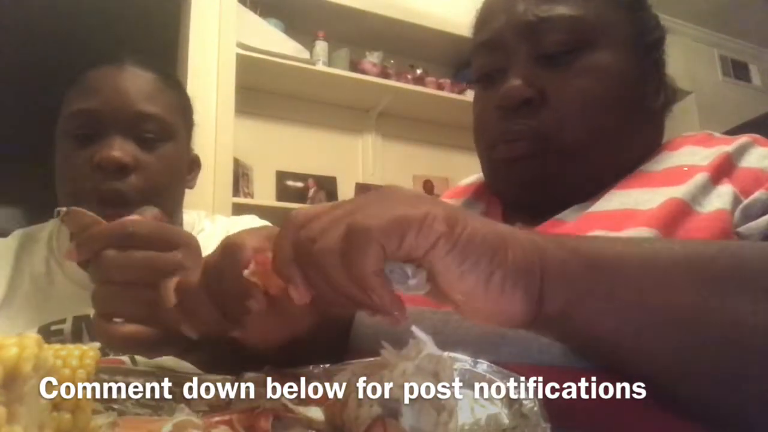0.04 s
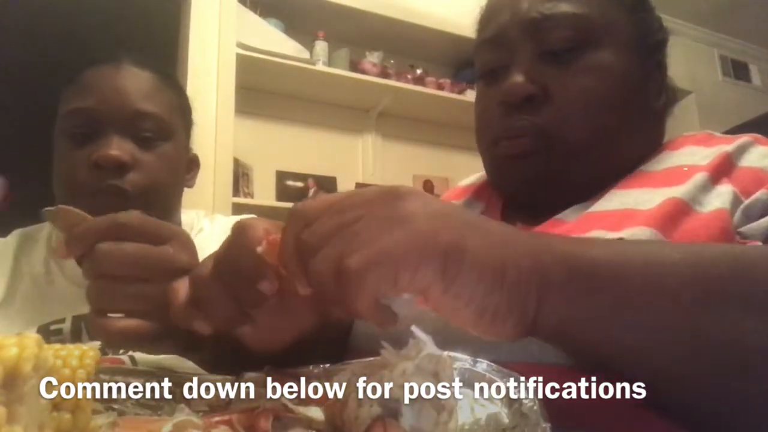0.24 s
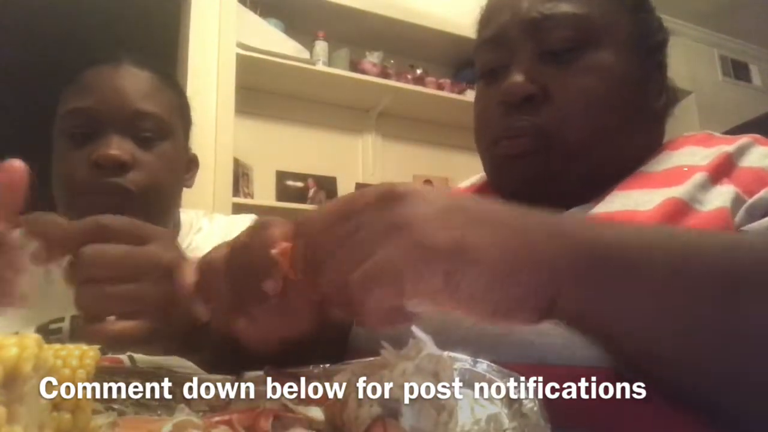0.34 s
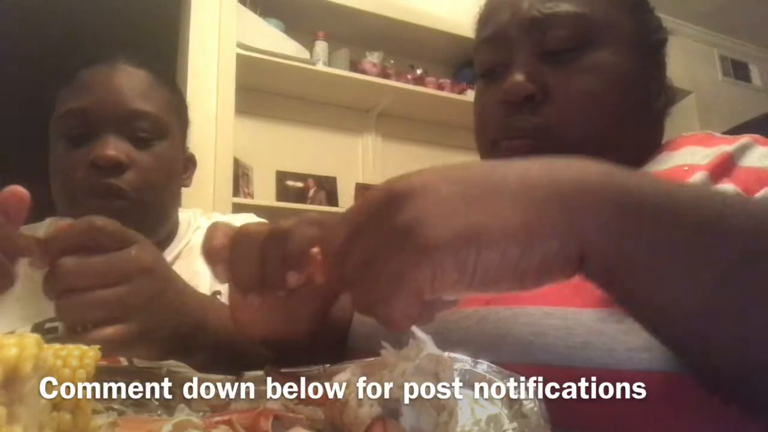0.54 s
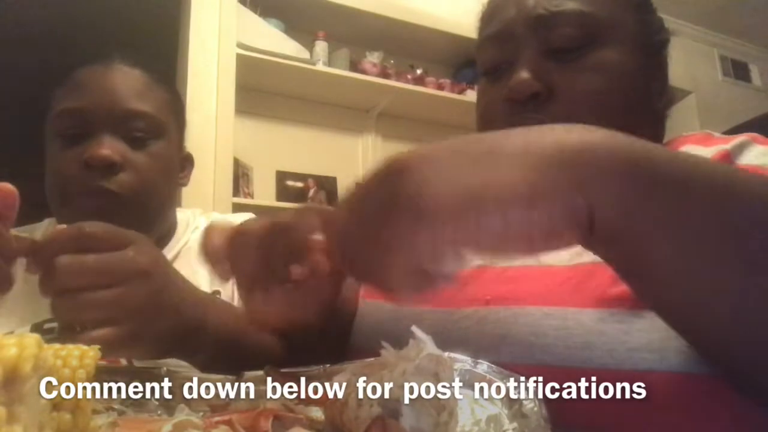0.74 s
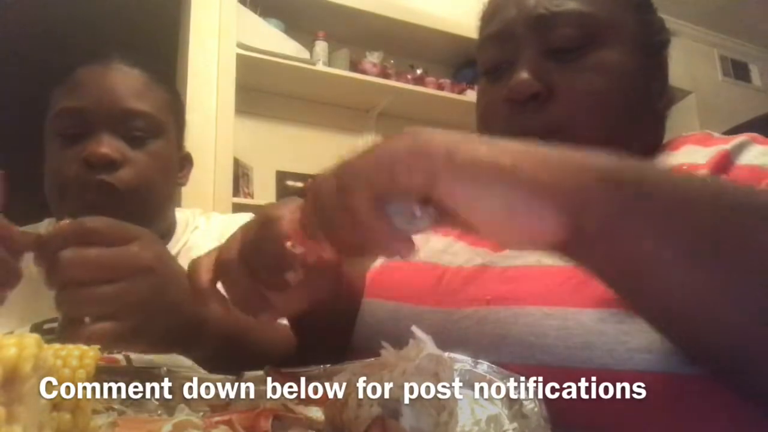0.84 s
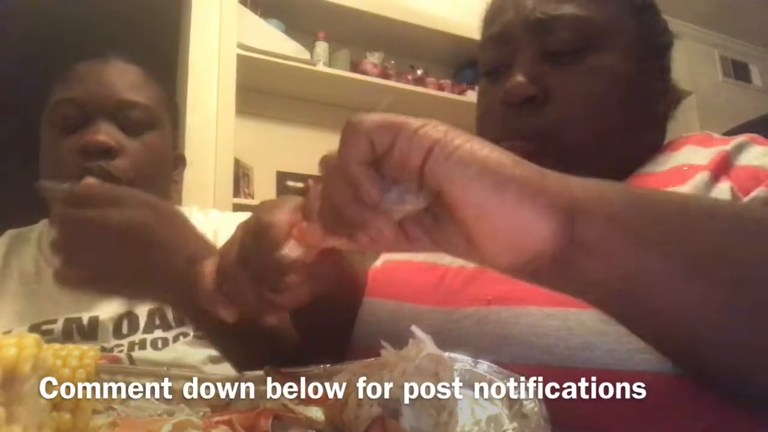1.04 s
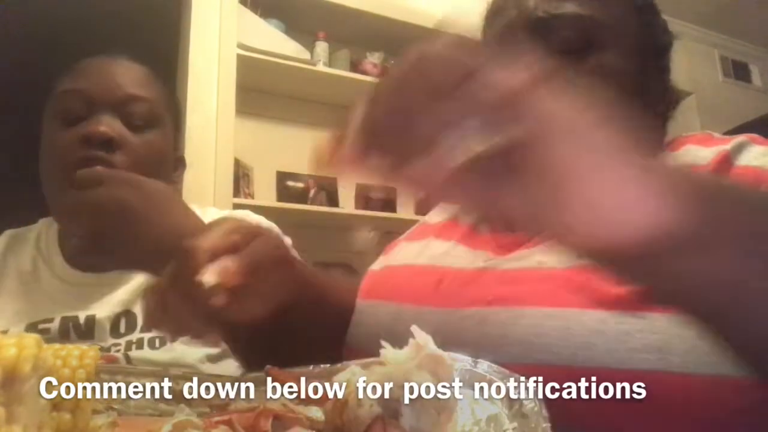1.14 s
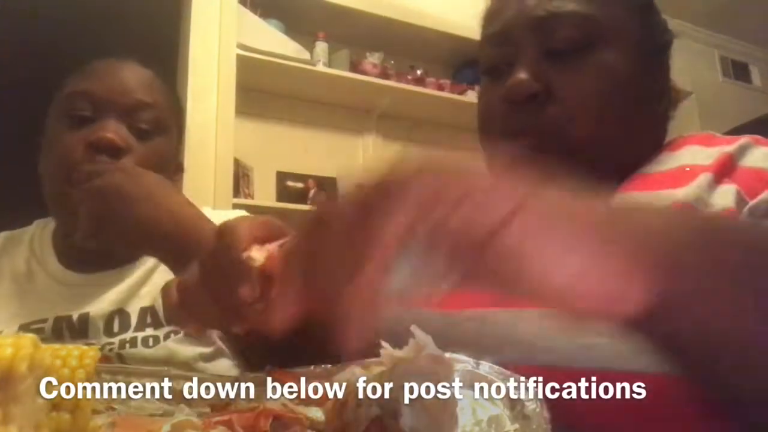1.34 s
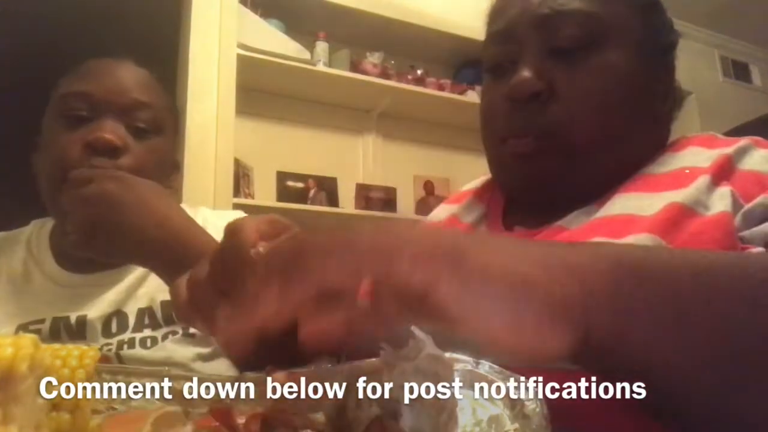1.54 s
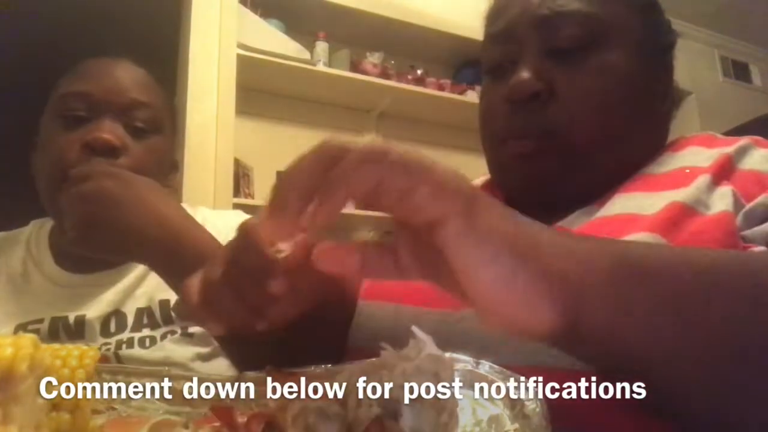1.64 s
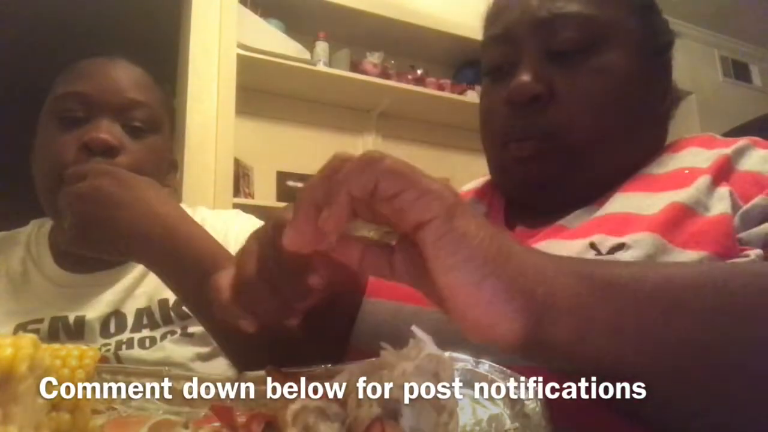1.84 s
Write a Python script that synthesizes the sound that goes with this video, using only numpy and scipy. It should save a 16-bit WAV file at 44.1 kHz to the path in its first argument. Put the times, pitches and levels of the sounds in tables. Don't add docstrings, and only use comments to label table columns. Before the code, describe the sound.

Shellfish shells cracked by hand at a table, sharp snaps, small ticks and a soft rustle

```python
import sys
import numpy as np
from scipy import signal
from scipy.fft import rfft, irfft, next_fast_len
from scipy.io import wavfile
from scipy.ndimage import uniform_filter1d, map_coordinates

SR = 44100
rng = np.random.default_rng(int(sys.argv[2]) if len(sys.argv) > 2 else 0)


def wav_record(signal):
    frames = np.transpose(np.atleast_2d(signal))
    bounded = np.clip(frames, -1, 1)
    quanta = np.round(bounded * 32767).astype(np.int16)
    wavfile.write(sys.argv[1], SR, quanta)


def invert_db(x):
    u = np.asarray(x, float) / 20
    return 10 ** u


N = 83790


def unit(x):
    return x / np.sqrt(np.mean(x ** 2) + 1e-20)


def along(points, hz):
    f, v = np.transpose(points)
    return np.interp(np.log(hz + 1), np.log(f + 1), v)


def filtered(x, response):
    m = next_fast_len(len(x) + 4096)
    return irfft(rfft(x, m) * response(np.fft.rfftfreq(m, 1 / SR)), m)[:len(x)]


def coloured(x, points):
    return filtered(x, lambda f: invert_db(along(points, f)))


def above(x, hz):
    return filtered(x, lambda f: (1j * f / (hz + 1j * f)) ** 2)


def add(track, s, x):
    part = track[round(s * SR):][:len(x)]
    part += x[:len(part)]


def grit(size, per_s, size_db):
    u, e, g = rng.random(size), rng.exponential(size=size), rng.standard_normal(size)
    happens = np.clip(per_s / SR / (u + 1e-9), 0, 1) ** 4
    return unit(happens * invert_db(size_db * np.minimum(e, 3)) * g)


def air():
    # frequency in Hz, level in dB.
    hiss_colour = [(15, -47.5), (30, -19), (52, -4), (110, -10.5), (280, -8), (450, -15.5), (4700, -29),
                   (8000, -35.5), (16500, -41)]
    # frequency in Hz, level in dB.
    hum_tones = [(60, -77.5), (120, -74.5), (180, -85), (240, -75.5)]
    hiss_db, patchy_db = -62, 0.8
    z = signal.stft(rng.standard_normal(N), nperseg=512)[2]
    patches = uniform_filter1d(uniform_filter1d(rng.standard_normal(z.shape), 6, 0), 12, 1)
    noise = signal.istft(z * invert_db(patchy_db * unit(patches)), nperseg=512)[1][:N]
    hiss = invert_db(hiss_db) * unit(coloured(noise, hiss_colour))
    t = np.arange(N) / SR
    return hiss + sum(invert_db(db) * np.sin(2 * np.pi * hz * t) for hz, db in hum_tones)


def crinkle(low_hz, high_hz, per_s, cycles, size_db, size):
    draw = rng.random((int(per_s * N / SR), 4))
    hz = low_hz * (high_hz / low_hz) ** draw[:, 1:2]
    u = hz * np.arange(size) / SR
    gain = hz * invert_db(-size_db * np.log(draw[:, 2:3] + .03))
    pops = gain * np.sin(2 * np.pi * (u + draw[:, 3:])) * np.exp(-u / cycles) * (1 - np.exp(-u))
    place = (draw[:, :1] * N).astype(int) + np.arange(size)
    return np.bincount(place.ravel(), pops.ravel())[:N]


def rustle():
    # start in seconds, rise in seconds, fall in seconds, level in dB,
    # body over the bright top in dB.
    strokes = [
        (.01, 0.0067, 0.027, -70.5, 9),
        (0.319, 0.031, 0.15, -57.5, 4),
        (0.85, 0.088, 0.12, -73.5, 10.5),
        (1.109, 0.023, 0.052, -62.5, 0),
        (1.258, 0.041, 0.039, -61.5, -3.5),
        (1.438, 0.0046, 0.055, -44.5, 1),
        (1.585, 0.0078, 0.063, -43, -1),
        (1.717, 0.037, 0.047, -48, 4),
        (1.78, 0.032, 0.087, -58.5, -32),
    ]
    # start in seconds, rise in seconds, fall in seconds, level in dB.
    slithers = [
        (.31, 0.034, 0.15, -63),
        (.78, 0.025, 0.027, -75),
        (1.26, 0.017, 0.051, -65.5),
        (1.44, 0.029, 0.023, -54),
        (1.74, 0.014, 0.059, -62.5),
    ]
    # frequency in Hz, level in dB.
    foil_colour = [(500, -57.5), (1300, -5), (2100, -2), (4600, -3.5), (5100, -15.5), (5700, -4),
                   (6500, -10.5), (16000, -36)]
    body_colour = [(88, -80), (150, -19), (500, -9.5), (1310, -14), (1500, -11.5), (1950, -6), (3300, -120)]
    slither_colour = [(600, -56), (2500, -9), (5000, -7.5), (8500, -7.5), (10500, -10.5), (13000, -3.5),
                      (16000, -15.5)]
    t = np.arange(N) / SR

    def shape(s, rise, fall):
        fade = np.exp(-(np.maximum(t - s - rise, 0) / fall) ** 2)
        return np.clip((t - s) / rise, 0, 1) ** 2 * fade

    def layer(x, points):
        return unit(coloured(np.pad(x, (0, N - len(x))), points))

    top = sum(invert_db(db) * shape(s, rise, fall) for s, rise, fall, db, _ in strokes)
    low = sum(invert_db(db + body_db) * shape(s, rise, fall) for s, rise, fall, db, body_db in strokes)
    thin = sum(invert_db(db) * shape(s, rise, fall) for s, rise, fall, db in slithers)
    clump = invert_db(2 * map_coordinates(rng.standard_normal(N // 200), [t * 150]))
    foil = crinkle(984, 16100, 5000, cycles=4.3, size_db=0.5, size=300)
    body = crinkle(193.0, 1734, 1200, cycles=2.55, size_db=4.0, size=900)
    slither = layer(grit(N, 20000, 2.5), slither_colour)
    return top * layer(foil, foil_colour) + low * layer(body, body_colour) + thin * clump * slither


def rings(peaks):
    def response(f):
        total = 0
        for k, (c, w, db) in enumerate(peaks):
            total = total + (-1) ** k * invert_db(db) * 1j * f * w / (c * c - f * f + 1j * f * w)
        return total
    return response


def fracture(ms, peaks, crack_db, breaks=((0, 9.5),)):
    # frequency in Hz, level in dB.
    crack_colour = [(400, -1.5), (1300, -0.5), (4000, -0.5), (9000, -5), (13000, -3), (16000, -11.5)]
    fractures_per_s, size_db, release = 16900, 4, 0.5
    sharpen = 0.29
    t = np.arange(SR // 20) / SR
    fade = np.exp(-np.maximum(t * 1000 / ms - 1, 0) / release)
    burst = grit(len(t), fractures_per_s, size_db) * fade
    at_ms, db = np.transpose(breaks)
    burst[np.round(abs(at_ms) * SR / 1000).astype(int)] = invert_db(db)
    push = rfft(burst)
    even = push / np.sqrt(uniform_filter1d(abs(push) ** 2, size=25))
    burst = irfft(even, len(t)) * (t < .04)

    def scale(x):
        return x / np.sqrt(np.sum(x ** 2) / (SR * ms / 1000))

    ring = scale(filtered(burst, rings(peaks)))
    crack = scale(coloured(burst * abs(burst) ** sharpen, crack_colour))
    return ring + invert_db(crack_db) * crack


def shells():
    # start in seconds, level in dB, tearing time in ms, broad crack in dB,
    # share reaching the room in dB.
    snaps = [
        (0.1703, -15.5, 1.9, -8.5, 6),
        (0.1895, -13, 5.5, -4, 1.4),
        (1.4335, -15.5, 3.16, -7.5, -6.5),
        (1.5553, -23, 3.7, 1, 5.5),
        (1.582, -24, 6.5, 4, 4.5),
    ]
    # frequency in Hz, width in Hz, level in dB.
    pieces = [
        [(720, 250, -18.5), (1270, 150, -7), (2143, 380, -6.5), (2970, 250, -4), (3650, 460, -2),
         (4250, 300, 5)],
        [(830, 490, -12.5), (1104, 125, 6.5), (1342, 193, 1), (1744, 220, 0), (2060, 296, 1), (2314, 160, -1),
         (2680, 200, -2.5), (4040, 460, -5), (5450, 620, -13.5)],
        [(833, 830, -5.5), (1500, 136, 4.5), (2000, 420, 1), (2600, 160, 2), (3200, 150, 2.5), (3740, 196, 4.5),
         (6060, 500, -11.5)],
        [(924, 100, -11), (2100, 170, -0.5), (3460, 450, -14), (6900, 370, -4)],
        [(935, 120, -12.5), (1690, 340, -12), (2370, 890, -11), (3100, 190, 10.5), (5900, 740, -7)],
    ]
    # time after its start in ms, level over the grit in dB.
    snap_breaks = [
        [(0, 20.5), (.8, 21)],
        [(0, 22), (.9, 23), (2.2, 20), (3.4, 20), (5.1, 20.5)],
        [(0, 19), (1.6, 13.5), (2.3, 20), (4.1, 15.5)],
        [(0, 22), (2.5, 13.5)],
        [(1.2, 17), (3.5, 15), (6.8, 9)],
    ]
    # start in seconds, level in dB, tearing time in
    # ms, ring in Hz, broad crack in dB.
    ticks = [(.1938, -18.5, 1.15, 2100, -15), (0.202, -24, 1, 1680, -36), (0.524, -61, 5.9, 2520, -13),
             (0.574, -57.5, 4.1, 2050, -1), (.752, -45, 1.53, 3330, 9), (0.762, -60, 3, 3610, 7),
             (0.8392, -53, 0.48, 12000, -7), (0.85, -55.5, 0.77, 3740, 7), (0.857, -57, 1.8, 1500, -21),
             (0.8834, -36.5, 1.4, 3660, -5.5), (0.893, -60, 5.6, 3470, -20), (0.896, -71, 1.7, 1890, -10),
             (1.027, -46.5, 2.8, 4060, 10), (1.0273, -44.5, 3.1, 1333, -13), (1.039, -46.5, 4.2, 3580, -2),
             (1.056, -59, 5.3, 2950, -14), (1.076, -49, 0.57, 5750, -0.5), (1.424, -40, 3.2, 3300, -0.5),
             (1.444, -42, 1.7, 1090, -13), (1.4646, -42, 2.9, 3520, -7), (1.5406, -33.5, 2.3, 3420, -4),
             (1.553, -32, 3, 1655, -5), (1.5773, -40.5, 2.8, 5900, 10.5),
             (1.457, -48, 2.2, 3200, -5), (1.476, -46, 2.4, 2000, -8), (1.479, -43, 3.4, 2800, -5),
                  (1.493, -43.5, 2, 2600, -6), (1.564, -40, 1.1, 2500, -5), (1.596, -37.5, 4.2, 1850, -15),
                  (1.604, -36, 3.3, 1610, -10), (1.613, -42, 3.4, 2100, 1.5), (1.623, -45, 2.7, 5500, 4),
                  (1.708, -49.5, 2.4, 3100, -10), (1.729, -54, 2, 1800, -8), (1.745, -42.5, 5.6, 1860, -11),
                  (1.7534, -43, 2.7, 1850, -10), (1.766, -43.5, 7.2, 5470, -4),
                  (1.764, -39, 3.8, 1470, -13), (1.774, -45, 3.2, 2500, -9), (1.779, -48, 3.8, 5900, -18),
                  (1.779, -55, 2.7, 1560, -12), (1.791, -46, 1.8, 2100, -17), (1.798, -53, 2.9, 2190, -6),
                  (1.817, -64, 2.7, 2640, -10), (1.22, -63, 1.4, 5000, -13), (.945, -66, .7, 8540, -5),
                  (.977, -67, .7, 8100, -8), (1.13, -60, 6, 1680, -13), (1.141, -58, 10.5, 2120, -12.5)]
    # start in seconds, level in dB.
    specks = [(.412, -49), (0.451, -52), (0.528, -62), (.6, -68.5), (.822, -65), (.828, -65), (1.176, -58),
              (1.208, -60.5), (1.229, -66), (1.365, -63), (1.727, -64), (1.799, -53)]
    dull_hz = 5000
    tick_q, twin, twin_db = 9, 1.186, -1
    out, far = np.zeros(N), np.zeros(N)
    for (s, db, ms, crack_db, far_db), piece, breaks in zip(snaps, pieces, snap_breaks):
        snap = invert_db(db) * fracture(ms, piece, crack_db, breaks)
        snap = filtered(snap, lambda f: 1 / (1 + 1j * f * invert_db(far_db) / dull_hz))
        add(out, s, snap)
        add(far, s, (invert_db(far_db) - 1) * snap)
    for s, db, ms, hz, crack_db in ticks:
        pair = [(hz, hz / tick_q, 0), (hz * twin, hz / tick_q, twin_db)]
        add(out, s, invert_db(db) * fracture(ms, pair, crack_db))
    for s, db in specks:
        add(out, s, invert_db(db) * fracture(0.51, [(13800, 4000, 0)], crack_db=-15))
    return out, out + far


def bumps():
    # start in seconds, peak level in dB, frequency in Hz.
    contacts = [(0.339, -37.5, 282), (0.366, -38.5, 355), (0.386, -38.5, 415), (.44, -37, 680),
                (0.572, -46, 390), (0.759, -44, 327), (0.766, -35.5, 390), (.772, -41, 750),
                (.781, -39.5, 487), (0.807, -44, 302), (.914, -51, 172), (.927, -47, 620), (0.95, -46, 940),
                (0.954, -46, 233), (0.998, -48, 124), (1.031, -51, 155), (1.728, -37, 850),
                (1.742, -46, 600), (1.7515, -31.5, 600), (1.759, -45, 706), (1.769, -43, 620),
                (1.777, -38, 540), (1.782, -41, 800), (1.787, -33.5, 694), (1.796, -33.5, 616),
                (1.08, -39.5, 800), (1.318, -40.5, 515), (1.42, -30, 490), (1.433, -20.5, 249),
                (1.449, -28.5, 344), (1.555, -26, 251), (1.5565, -34, 796), (1.583, -19.5, 354),
                (1.587, -18, 566), (1.5921, -26, 1040), (1.399, -42, 254), (1.591, -35, 112),
                (1.628, -26.5, 414), (1.602, -28, 750), (1.619, -45, 51), (1.636, -47, 620)]
    bump_q = 2.7
    out, t = np.zeros(N), np.arange(SR // 8) / SR
    for s, db, hz in contacts:
        u = hz * t
        swell = (1 - np.exp(-2 * u)) * np.exp(-np.pi * u / bump_q)
        push = invert_db(db) * 2 * np.sin(2 * np.pi * u) * swell
        add(out, s, above(push, hz / 2))
    return out


def room(x):
    # frequency in Hz, time to fall by 60 dB in seconds.
    ring_time = [(250, 0.64), (1500, 0.53), (5000, 0.64), (14000, 0.39)]
    # frequency in Hz, level in dB.
    echo_colour = [(700, 1.5), (1150, -2.5), (1700, 4.5), (2400, -0.5), (3900, -1), (5600, 1), (9000, 0)]
    room_db, table_db, table_t60 = -16, -16.5, 0.056
    hz, t, z = signal.stft(rng.standard_normal(SR * 3 // 4), SR, nperseg=256)
    tail = signal.istft(z * invert_db(-60 * t / along(ring_time, hz)[:, None]), SR, nperseg=256)[1]
    size = len(tail)
    near = rng.standard_normal(size) * invert_db(-60 * np.arange(size) / SR / table_t60)
    late = invert_db(room_db) * np.pad(tail, (400, 0))[:size] / np.linalg.norm(tail)
    early = invert_db(table_db) * np.pad(near, (250, 0))[:size] / np.linalg.norm(near)
    return coloured(signal.fftconvolve(x, late + early)[:N], echo_colour)


def scene():
    low_cut_hz = 200
    near, far = shells()
    soft = bumps() + rustle()
    echo = room(above(far + soft, low_cut_hz))
    return (above(near, low_cut_hz) + soft + echo + air())[None]


def band_limit(x):
    return signal.sosfilt(signal.butter(12, 16660, fs=SR, output="sos"), x)


def record(dry):
    top_hz = 15900
    mix = filtered(dry[0], lambda f: invert_db(-25 * np.clip((f - top_hz) / 300, 0, 1)) * (f < 16700))
    return band_limit(mix[None])


dry = scene()
out = record(dry)
wav_record(out)
```